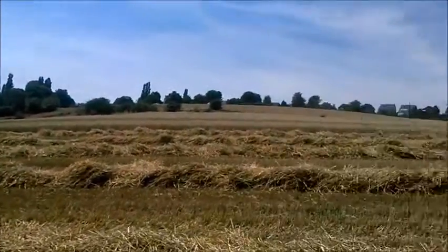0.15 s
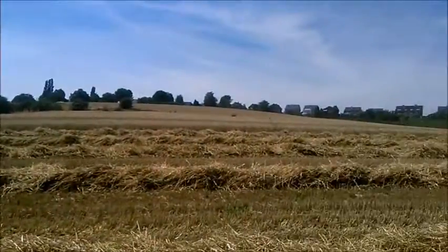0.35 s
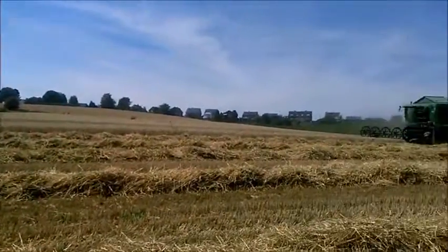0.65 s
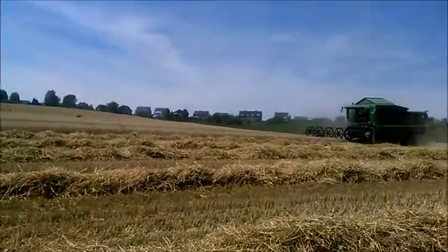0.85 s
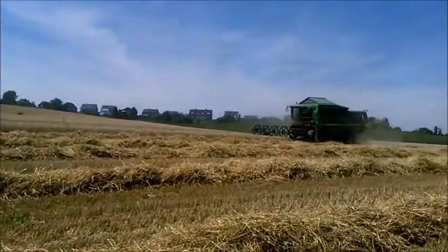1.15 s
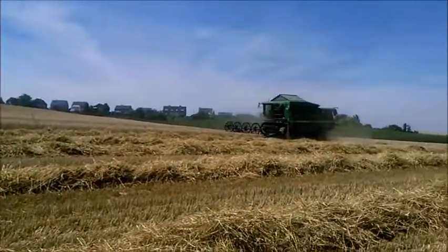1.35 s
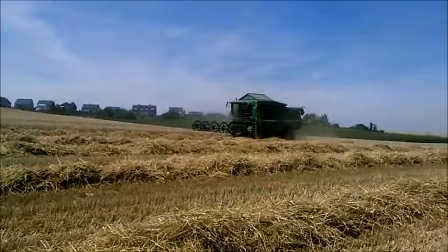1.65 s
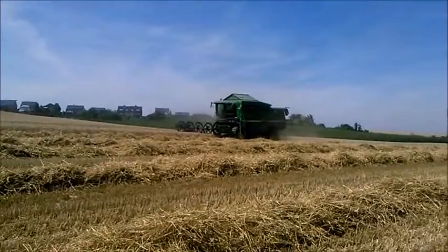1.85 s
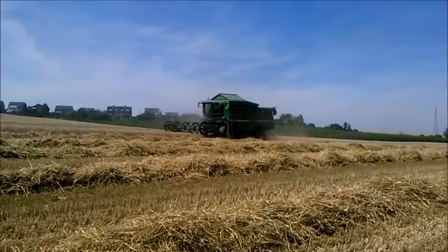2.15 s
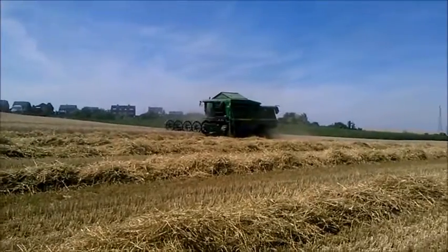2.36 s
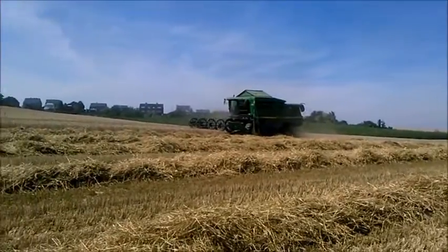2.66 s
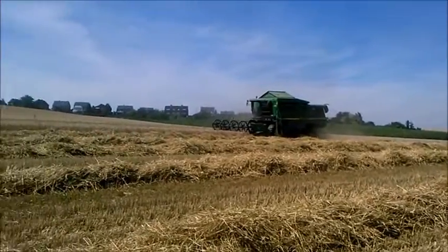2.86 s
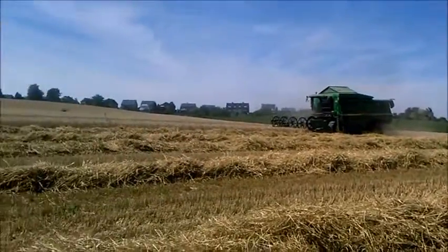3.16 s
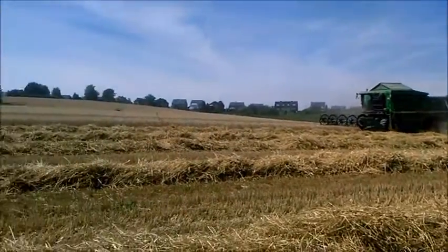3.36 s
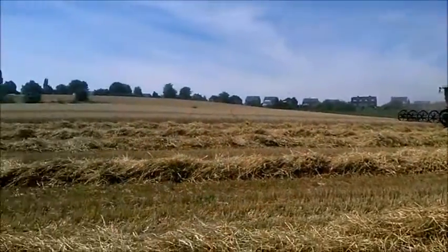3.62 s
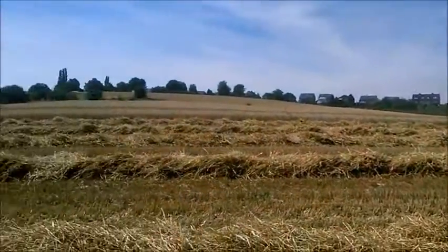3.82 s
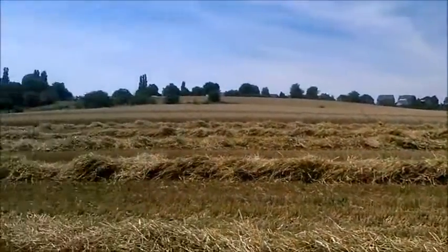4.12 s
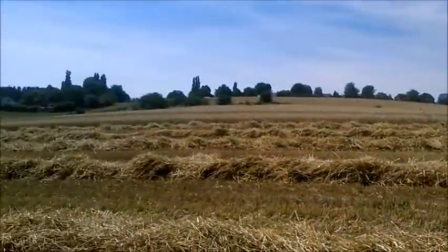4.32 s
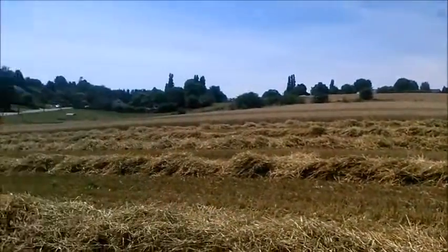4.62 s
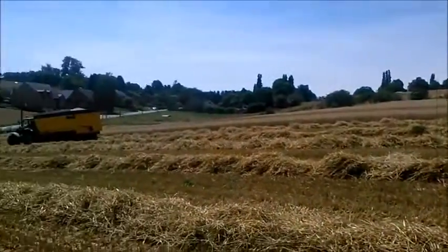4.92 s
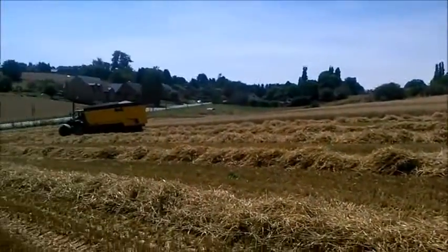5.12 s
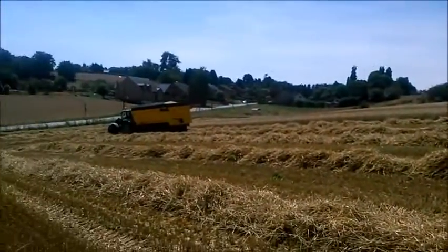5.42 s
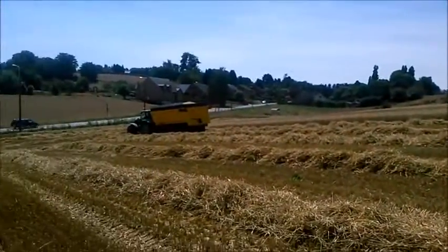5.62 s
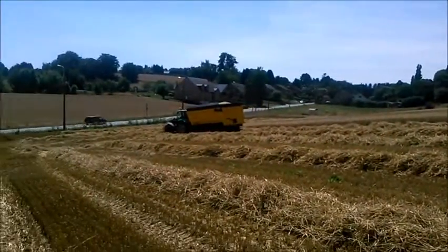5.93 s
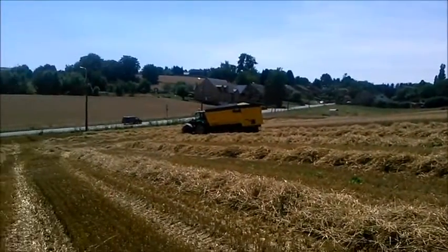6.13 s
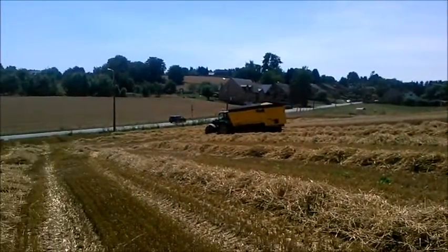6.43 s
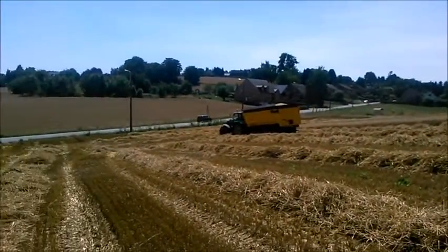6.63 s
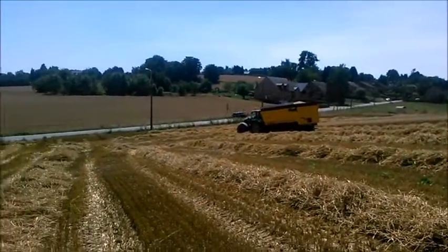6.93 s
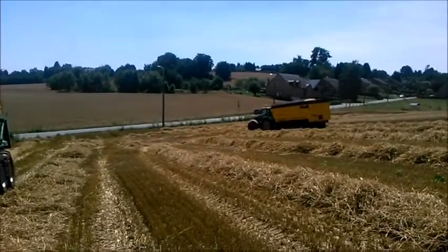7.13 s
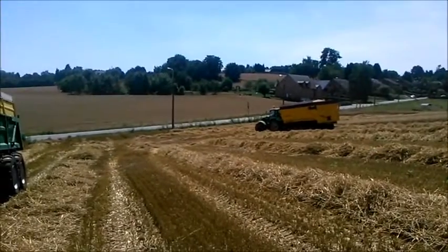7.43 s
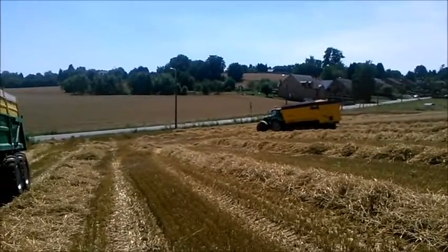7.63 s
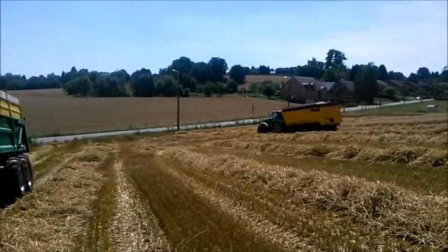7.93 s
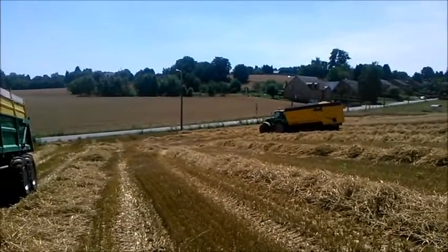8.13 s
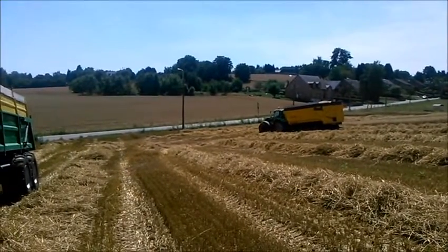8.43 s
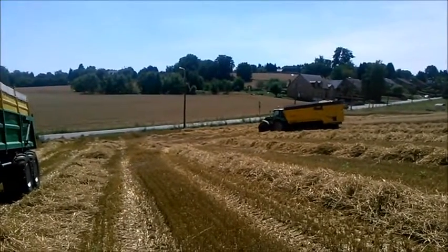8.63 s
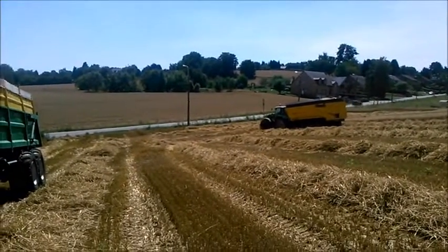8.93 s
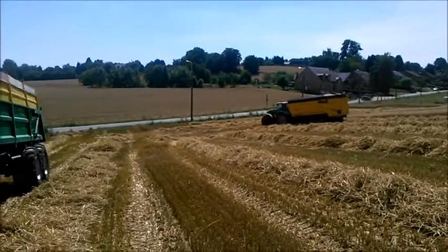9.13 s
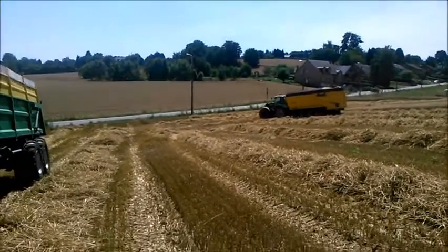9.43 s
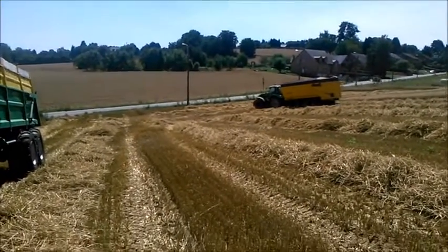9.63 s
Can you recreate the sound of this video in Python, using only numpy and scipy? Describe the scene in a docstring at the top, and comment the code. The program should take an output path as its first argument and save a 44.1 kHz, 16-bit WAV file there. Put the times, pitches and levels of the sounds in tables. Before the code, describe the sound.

A hand-held mono microphone in an open stubble field picks up a steady combine harvester: low diesel hum, whirring fan and gear tones, and a broad threshing roar. From 0 to about 1 second, strong wind buffets the microphone with deep rumbles, lumpy flutter and sharp thumps while the roar's colour slides. From 1.3 to 3.6 the drone is even and clear. Light gusts return near 3.6, building to heavy rumbling between 4.3 and 5.3, fading by about 6. Dry straw rustles at 5 to 5.4. As the microphone turns, a tractor's idling diesel gradually takes over by about 7, with even clatter, brighter hiss and a thin pump whine swelling around 7. Very high, faint insect chirps fall near 2, 4, 6 and 8 seconds, the later ones clearer. Small straw swishes come at 7.4 and 9.5; the engine hum continues to the end at 9.8.

```python
"""A combine harvester drones across a stubble field; a hand-held microphone pans from it to a tractor.
Roars are coloured noise that sweeps with the turn; diesel, fan and gears are harmonics, whines wandering tones.
Two main bouts of gusts buffet the microphone: low noise, lumpy flutter and sharp pressure dips.
Straw rustles as grainy noise; an insect chirps about every two seconds as narrow-band noise."""
import sys
import numpy as np
from scipy import signal
from scipy.fft import rfft, irfft, next_fast_len
from scipy.io import wavfile

SR = 44100
rng = np.random.default_rng(int(sys.argv[2]) if len(sys.argv) > 2 else 0)


def put_to_file(sound):
    """Save the sound as 16-bit audio at rate SR, in the file named by the first command-line argument."""
    columns = np.atleast_2d(sound).T  # one column per channel
    safe = np.clip(columns, -1, 1)
    whole_steps = np.round(safe * 32767)
    wavfile.write(sys.argv[1], SR, whole_steps.astype(np.int16))


N = 430857
TIME = np.arange(N) / SR
CYCLE_HZ, FAN_HZ, GEAR_HZ = 19.7, 266.8, 510.4  # median rates of diesel cycle, fan blades, gear mesh

# microphone pan: (time [s], heading [0 = at the combine, 1 = at the tractor])
HEADING = [(0, 0.38), (.6, .07), (1.2, 0.016), (3.5, 0), (4.4, 0.13), (4.8, 0.19), (5.2, 0.53), (6.2, 0.7),
           (7, 0.82), (8.4, 0.94), (9.77, 0.95)]
# shaft speed, common to diesel, fan and gears: (time [s], fan's third harmonic [Hz])
SHAFT_SPEED = [(0.0, 801.3), (0.46, 793.6), (0.54, 801.6), (1.77, 800.5), (9.25, 799.8), (9.77, 795.2)]
# deep wind noise on the microphone: (frequency [Hz], relative level per Hz [dB])
BUFFET_SPECTRUM = [(12, -7), (30, 0.5), (70, 2.5), (110, -6.5), (180, -9.5), (400, -36), (1000, -78)]


def gain_of(db):
    """Amplitude factor of a level in dB."""
    return 10 ** (np.asarray(db) / 20)


def evened(x):
    """Scales x to rms 1."""
    return x / np.sqrt(np.mean(x ** 2) + 1e-20)


def read(points, hz):
    """A spectrum in dB, joined on a log-frequency axis."""
    f, value = np.transpose(points)
    return np.interp(np.log(hz + 1), np.log(f + 1), value)


def follow(rows):
    """Every column of a curve, at every sample."""
    s, *columns = np.transpose(rows)
    return [np.interp(TIME, s, c) for c in columns]


def coloured(x, spectrum):
    """Filters x with a fixed spectrum."""
    size = next_fast_len(N)
    gain = gain_of(read(spectrum, np.fft.rfftfreq(size, 1 / SR)))
    return irfft(rfft(x, size) * gain, size)[:N]


def noise(spectrum):
    """Steady noise of rms 1 with the given colour."""
    return evened(coloured(rng.standard_normal(next_fast_len(N)), spectrum))


def slide(x, points, factor):
    """Colours x with a spectrum whose frequencies are multiplied by a moving factor."""
    hz, t, z = signal.stft(x, SR, nperseg=1024, noverlap=768)
    colour_db = read(points, hz[:, None] / np.interp(t, TIME, factor))
    return signal.istft(z * gain_of(colour_db), SR, nperseg=1024, noverlap=768)[1][:N]


def drift(rate_hz):
    """Slow random curve of rms 1, with changes up to about rate_hz."""
    size = 4096
    hz = np.fft.rfftfreq(size, TIME[-1] / size)
    slow = irfft(rfft(rng.standard_normal(size)) / (1 + (hz / rate_hz) ** 2))
    return np.interp(TIME, np.linspace(0, TIME[-1], size), evened(slow))


def tractor_share():
    """The tractor's share of the sound power: it takes over late in the turn."""
    handover, width = 0.76, 0.068  # heading
    share_away, share_facing = 0.095, 1
    heading, = follow(HEADING)
    facing = 1 / (1 + np.exp((handover - heading) / width))
    return np.clip(share_away + (share_facing - share_away) * facing, 0, 1)


def shaft_turns(base_hz):
    """Accumulated turns of a part whose rate follows the common shaft speed."""
    hz, = follow(SHAFT_SPEED)
    return np.cumsum(base_hz * hz / np.median(hz)) / SR


def combine_roar(ahead_db=1.07, aside_db=0.0, beam=0.03):
    """Threshing and engine noise; a close reflection's path shortens in the turn, so its ripple slides up."""
    # roar: (frequency [Hz], relative level per Hz [dB])
    roar_spectrum = [(20.0, 0), (130.0, 3.5), (215.0, -1.5), (280.0, -9.5), (350.0, -20.5), (520.0, -13),
                     (1000.0, -17), (2000.0, -16.0), (2700.0, -22.5), (3400.0, -30), (6200.0, -33.5),
                     (8000.0, -51), (12300.0, -41), (13200.0, -60)]
    # reflection ripple at heading 0: (frequency [Hz], gain [dB])
    ripple_spectrum = [(720.0, 0.1), (870.0, 2), (1060.0, 7), (1250.0, 0.5), (1390.0, -2), (1690.0, 9.5),
                       (1980.0, -3.5), (2350.0, 4), (2600.0, -0.5), (3240.0, -6.5), (3470.0, 5),
                       (3740.0, 0.5), (4030.0, 6), (4960.0, -4), (5670.0, 5), (5920.0, -5), (6140.0, 10.5),
                       (6890.0, 4)]
    level_db, ripple_rise = -41, 1.4  # level before ripple and beam; relative pitch rise at heading 1
    heading, = follow(HEADING)
    rippled = slide(noise(roar_spectrum), ripple_spectrum, 1 + ripple_rise * heading)
    beam_db = aside_db + (ahead_db - aside_db) * np.exp(-(heading / beam) ** 2)  # loudest straight ahead
    return gain_of(level_db + beam_db) * rippled


def tractor_roar(level_db=-40):
    """Broadband tractor noise whose colour slides up a little as the microphone comes round."""
    # roar: (frequency before sliding [Hz], relative level per Hz [dB])
    roar_spectrum = [(70.0, 0.5), (210.0, -1), (340.0, -12), (480.0, -7.5), (900.0, -13.5), (1300.0, -11.5),
                     (2050.0, -24.5), (2350.0, -16), (2750.0, -17), (3200.0, -29), (3700.0, -22.5),
                     (4300.0, -24.5), (5300.0, -23.5), (6200.0, -44), (14000.0, -57)]
    sliding = slide(rng.standard_normal(N), roar_spectrum, 0.884 + 0.12 * tractor_share())
    return gain_of(level_db) * evened(sliding)


def roar(unsteady_db=0.63):
    """Both roars, cross-faded at constant power, with a common random unsteadiness."""
    share = tractor_share()
    mix = np.sqrt(1 - share) * combine_roar() + np.sqrt(share) * tractor_roar()
    return mix * gain_of(unsteady_db * drift(23))


def shaft(tones, base_hz, fading_db, jitter_rad):
    """Harmonics of one shaft; moving air makes each fade and waver on its own."""
    share = tractor_share()
    turns = shaft_turns(base_hz)
    out = np.zeros(N)
    for multiple, combine_db, tractor_db in tones:
        level_db = combine_db + share * (tractor_db - combine_db) + fading_db * drift(4.2)
        phase = 2 * np.pi * (multiple * turns + rng.random()) + jitter_rad * drift(5.9)
        out += gain_of(level_db) * np.sin(phase)
    return np.sqrt(2) * out  # levels are rms


def diesel():
    """Orders of the diesel cycle, which holds six firings."""
    # tones: (multiple of the cycle rate, level at tractor share 0 [dB], at tractor share 1 [dB])
    orders = [(3, -53, -55), (4, -55, -48), (6, -42.5, -45), (7, -44, -49), (12, -42.5, -44),
              (14, -59.5, -55.5), (16, -64.5, -65), (24, -61.5, -60), (29, -89, -89), (30, -106, -83)]
    return shaft(orders, CYCLE_HZ, fading_db=0.75, jitter_rad=0.096)


def clatter(level_db=-51, fading_db=2.0, size=2048):
    """Valves and injectors repeat the same rattle every diesel cycle: a dense comb of weak orders."""
    order_hz = CYCLE_HZ * np.arange(size // 2 + 1)
    spectrum = [(90, -25), (170, 6.5), (330, 4.0), (470, -2.5), (740, 5),
                (1300, -1), (2400, -11.0), (4000, -32.5)]  # (Hz, relative dB)
    random_phases = np.exp(2j * np.pi * rng.random(len(order_hz)))
    cycle = evened(irfft(gain_of(read(spectrum, order_hz)) * random_phases))
    repeated = np.interp(shaft_turns(CYCLE_HZ), np.arange(size) / size, cycle, period=1)
    return repeated * gain_of(level_db + fading_db * drift(3.0))


def cooling_fan():
    """Harmonics of the fan's blade rate, with a slow swell."""
    # tones before the swell: (multiple, level at tractor share 0 [dB], at tractor share 1 [dB])
    blade_tones = [(1, -54, -46.5), (2, -52.5, -56.5), (3, -54.5, -46.5), (4, -71, -61), (5, -63, -59.5),
                   (6, -64, -73)]
    # swell: (time [s], gain [dB])
    swell = [(0, 0.5), (1.5, 3), (3, 1.5), (4.5, 1), (6, 0), (7.5, -3), (8.1, -1.5), (8.7, 1), (9.4, -0.5),
             (9.77, 0)]
    return shaft(blade_tones, FAN_HZ, fading_db=0.83, jitter_rad=0.19) * gain_of(follow(swell)[0])


def gears():
    """Harmonics of the gear mesh, swelling and fading."""
    # tones before the swell: (multiple, level at tractor share 0 [dB], at tractor share 1 [dB])
    mesh_tones = [(1, -60.5, -60), (2, -65, -61.5), (3, -68.5, -63), (4, -61.5, -95), (8, -76, -93)]
    # swell: (time [s], gain [dB])
    swell = [(0, -1.5), (4.5, 1), (5.8, -1), (6.3, 1.5), (7.3, -2), (8.2, -2), (8.7, 4), (9.4, 7),
             (9.77, 0)]
    return shaft(mesh_tones, GEAR_HZ, fading_db=3, jitter_rad=0.67) * gain_of(follow(swell)[0])


def whistle(hz, level_db, wander_hz, blur_hz, fading_db):
    """A high tone whose pitch wanders slowly and blurs fast, and whose level fades in and out."""
    turns = np.cumsum(hz + wander_hz * drift(2.04) + blur_hz * drift(69.0)) / SR
    tone = gain_of(fading_db * drift(14)) * np.sin(2 * np.pi * turns)
    return gain_of(level_db) * evened(tone)


def pump_whine(pitch_hz=2718):
    """Whine of a hydraulic pump: one wandering tone."""
    # loudness: (time [s], level [dB])
    loudness = [(0, -62), (1, -65.5), (3, -64), (4.6, -67), (5.3, -68), (6.2, -76), (6.9, -54.5),
                (7.6, -56.5), (8.1, -64), (9.77, -58.5)]
    return whistle(pitch_hz, follow(loudness)[0], wander_hz=2.98, blur_hz=6.08, fading_db=3.5)


def gear_whine():
    """The gear mesh's fifth harmonic stands out as a whine of its own."""
    # loudness: (time [s], level [dB])
    loudness = [(0, -68), (.6, -59), (1.4, -73), (5.7, -68), (6.4, -60), (8.7, -61), (9.77, -67)]
    return whistle(5 * GEAR_HZ, follow(loudness)[0], wander_hz=4, blur_hz=3, fading_db=1.5)


def turbocharger(half_length_s=0.12, combine_db=-84, tractor_db=-62):
    """High, faint whistle, steadier toward the tractor; short swells are clearest at the combine."""
    # swells, pitch gliding between them: (time [s], centre pitch [Hz], level [dB])
    swell_rows = [(.45, 9300, -65), (.92, 9230, -67), (3.25, 9400, -68), (4.87, 9090, -63),
                  (6.071, 9070, -65), (6.55, 9370, -77), (6.85, 9170, -63), (7.9, 9350, -68),
                  (8.6, 9220, -66)]
    heading, = follow(HEADING)
    base = gain_of(combine_db + (tractor_db - combine_db) * heading)  # level under the swells
    swells = sum(gain_of(db) / (1 + ((TIME - s) / half_length_s) ** 2) for s, _, db in swell_rows)
    tone = whistle(follow(swell_rows)[0], 0, wander_hz=12, blur_hz=35, fading_db=3.5)
    return tone * np.hypot(base, swells)


def hiss(flicker_db=1.02, pitch=0.89, pitch_rise=0.28):
    """Thin hiss of the field: noise that brightens toward the tractor, with a flickering level."""
    # colour: (frequency before scaling [Hz], relative level per Hz [dB])
    hiss_spectrum = [(3000, -26), (5400, -11.5), (6500, -8.5), (7500, -2.5), (8500, 1), (9300, 1),
                     (11000, -4), (12400, -4), (13100, -8), (14300, -14)]
    # loudness before flicker: (time [s], level [dB])
    loudness = [(0, -57.5), (.9, -58), (1.6, -64.5), (2.7, -67), (3.35, -58.5), (4.7, -58.5), (5.35, -50.5),
                (7.8, -56), (9.77, -52)]
    brightness = pitch + pitch_rise * follow(HEADING)[0] ** 2  # factor on the frequencies
    bright_noise = evened(slide(rng.standard_normal(N), hiss_spectrum, brightness))
    return bright_noise * gain_of(follow(loudness)[0] + flicker_db * drift(13))


def breeze(lull_db=-54, swell_db=-43, centre_s=5.25, half_length_s=1.5):
    """Light air: a soft rumble on the microphone that freshens around the second bout of gusts."""
    swell = np.exp(-((TIME - centre_s) / half_length_s) ** 2)
    return noise(BUFFET_SPECTRUM) * (gain_of(lull_db) + gain_of(swell_db) * swell)


def gusts(buffet_db=-2, flutter_db=3.5, lumps_db=2.5, eddies_per_s=600, spread_db=4):
    """Turbulence at the port: gusts rise, hold and die away as deep buffeting and flutter of small eddies."""
    # gusts: (start [s], hold [s], buffeting before buffet_db [dB], flutter before flutter_db [dB])
    gust_rows = [(0.046, 0.12, -26.5, -33.5), (0.192, .04, -26, -29.5), (0.256, 0.1, -24, -34.5),
                 (0.384, .11, -26, -31.5), (0.566, .04, -23.5, -32.5), (.64, 0.044, -28, -32.5),
                 (.74, 0.078, -30, -33.5), (0.857, .03, -31, -39.5), (.94, 0.035, -35.5, -62),
                 (1.227, 0.056, -35, -70), (3.634, 0.054, -35, -56), (4.167, 0.042, -37, -43.5),
                 (4.35, 0.12, -35, -41.5), (4.625, 0.037, -34, -41), (4.689, 0.06, -23, -40.5),
                 (4.804, 0.21, -23.5, -37.5), (5.04, 0.062, -31, -44.5), (5.168, 0.13, -30.5, -50),
                 (5.506, 0.043, -39, -45), (5.665, .05, -33, -46), (5.902, .04, -30, -47),
                 (6.27, .05, -35, -55), (8.006, 0.21, -40, -64), (9.23, .12, -37.5, -58)]
    # flutter colour: (frequency [Hz], relative level per Hz [dB])
    flutter_spectrum = [(30, -9), (80, -19), (140, 6), (250, -2.5), (400, -5.5), (650, -15), (1000, -33),
                        (2000, -53), (5000, -80)]
    attack_s, release_s = 0.034, 0.039
    buffet, flutter = np.zeros((2, N))
    for start, hold, deep_db, upper_db in gust_rows:
        t = TIME - start
        envelope = np.exp(np.minimum(t, 0) / attack_s - np.maximum(t - hold, 0) / release_s)
        buffet = np.maximum(buffet, envelope * gain_of(deep_db + buffet_db))
        flutter = np.maximum(flutter, envelope * gain_of(upper_db + flutter_db))
    strengths = gain_of(spread_db * rng.uniform(-0.84, 1, N))
    puffs = -strengths * (rng.random(N) < eddies_per_s / SR)  # random negative pulses
    puffs = coloured(puffs - puffs.mean(), flutter_spectrum)
    lumpy = evened(puffs * gain_of(lumps_db * drift(43)))
    return buffet * noise(BUFFET_SPECTRUM) + flutter * lumpy


def eddies(suction_db=-1, swirl_db=-18, swirl_s=0.018, breadth=3):
    """Strong eddies: a sharp pressure drop within a broader rise of equal area, inside a short swirl."""
    # strikes: (time [s], level before suction_db or swirl_db [dB], width scale of the drop [s])
    strikes = [(.068, -12, 0.00066), (0.127, -13, 0.00068), (.197, -12, 0.00063), (0.398, -7, 0.0012),
               (0.447, -13, 0.00056), (0.477, -13, 0.00054), (0.584, -8.5, 0.0015), (.801, -8, 0.0019),
               (3.658, -14.5, 0.0025), (4.431, -17, .0019), (4.719, -16, 0.0076), (4.815, -7, 0.00077),
               (4.914, -13, 0.0014), (4.96, -11, 0.0011), (5.18, -16.5, 0.0028), (5.907, -14.5, 0.0011)]
    suction, swirl = np.zeros((2, N))
    for s, db, length in strikes:
        near = abs(TIME - s) < .15
        t = TIME[near] - s
        dip = 1 / np.cosh(np.clip(2 * t / length, -60, 60))
        refill = np.exp(-(t / (breadth * length)) ** 2) * np.sqrt(np.pi) / (2 * breadth)
        suction[near] += gain_of(db + suction_db) * (refill - dip)
        swirl[near] += gain_of(db + swirl_db) * np.exp(-(t / swirl_s) ** 2)
    swirl_noise = noise([(15, 10), (50, -1), (130, 13.5), (300, -20.0), (700, -11), (2000, -62)])
    return suction + swirl * swirl_noise


def insect(width_s=.03):
    """A bush cricket's short, high chirps: narrow-band noise in bell-shaped bursts."""
    # chirps: (time [s], level [dB])
    chirp_rows = [(2.075, -66), (4.07, -74), (6.11, -56), (8.13, -55)]
    loudness = sum(gain_of(db) * np.exp(-((TIME - s) / width_s) ** 2) for s, db in chirp_rows)
    return loudness * noise([(11500, -60), (12150, -12), (12350, 0), (12550, -12), (13200, -60)])


def straw(grain_db=5.0):
    """Dry stalks rustling close by: short swishes of noise with a fast random grain."""
    # swishes: (centre [s], level [dB], half length [s])
    swishes = [(5.0, -59, 0.23), (5.238, -45, 0.015), (5.407, -51.5, 0.057), (7.447, -52, .008),
               (9.42, -55, 0.028), (9.56, -49.5, 0.036)]
    # colour: (frequency [Hz], relative level per Hz [dB])
    straw_spectrum = [(2000, -16), (4000, 3.5), (6000, 3), (8000, 4.5), (12500, -1), (14500, -12)]
    stroke = sum(gain_of(db) / (1 + ((TIME - s) / length) ** 4) for s, db, length in swishes)
    return stroke * evened(noise(straw_spectrum) * gain_of(grain_db * drift(150)))


def scene():
    """Machines, field hiss, wind, insect and straw, summed to one channel."""
    machinery = diesel() + clatter() + cooling_fan() + gears()
    whines = pump_whine() + gear_whine() + turbocharger()
    wind = breeze() + gusts() + eddies()
    return (roar() + machinery + whines + hiss() + wind + insect() + straw())[None]


def record(dry, edge_hz=14240):
    """The recorder's band limit: a steep low-pass."""
    lowpass = signal.firwin(2047, edge_hz, window=("kaiser", 9), fs=SR)
    return signal.oaconvolve(dry, lowpass[None], "same")


dry = scene()
out = record(dry)
put_to_file(out)
```